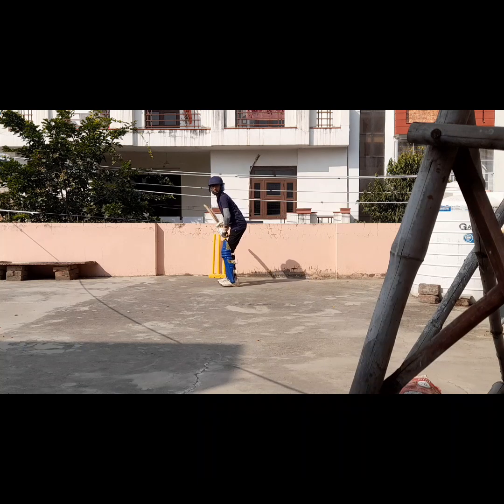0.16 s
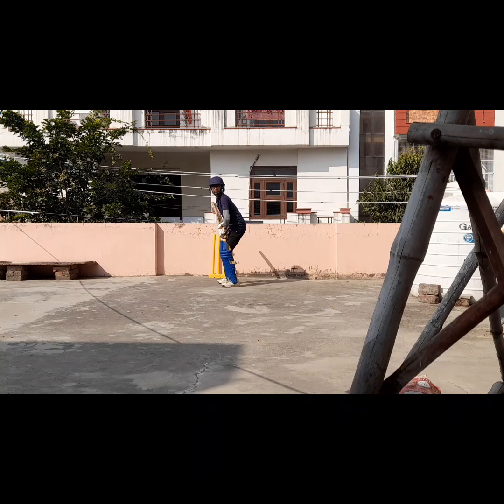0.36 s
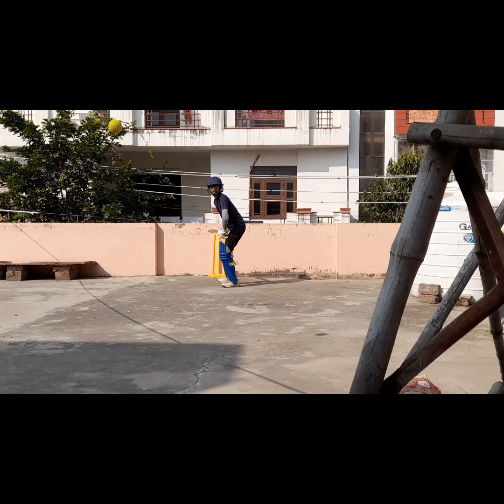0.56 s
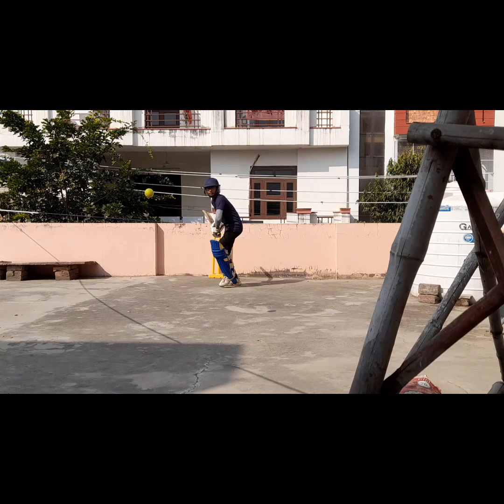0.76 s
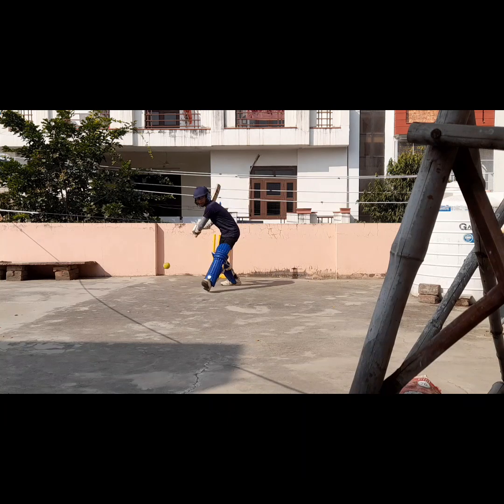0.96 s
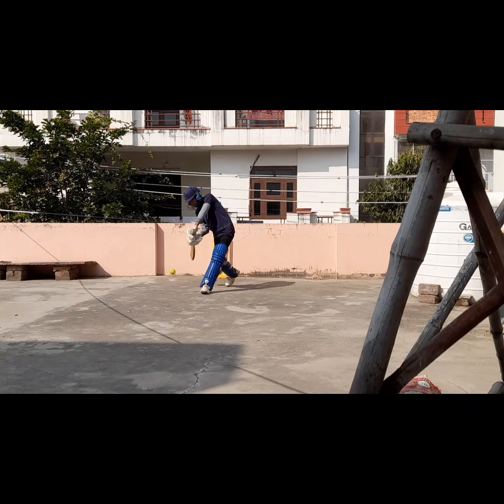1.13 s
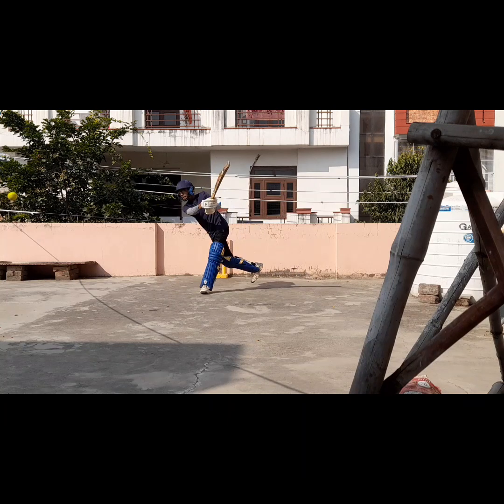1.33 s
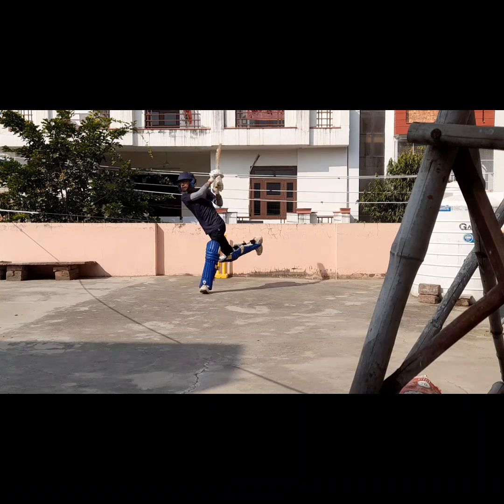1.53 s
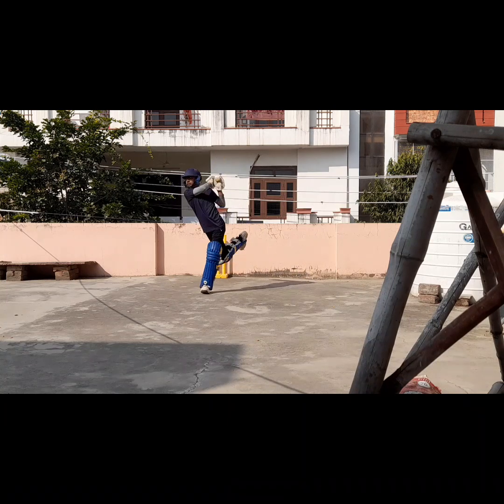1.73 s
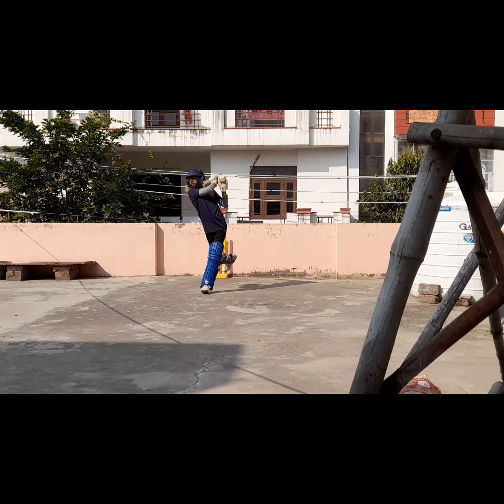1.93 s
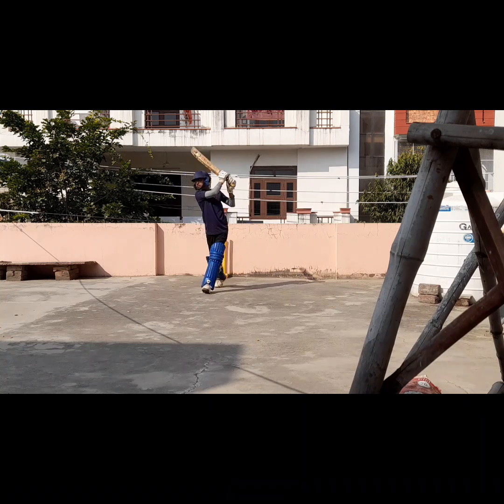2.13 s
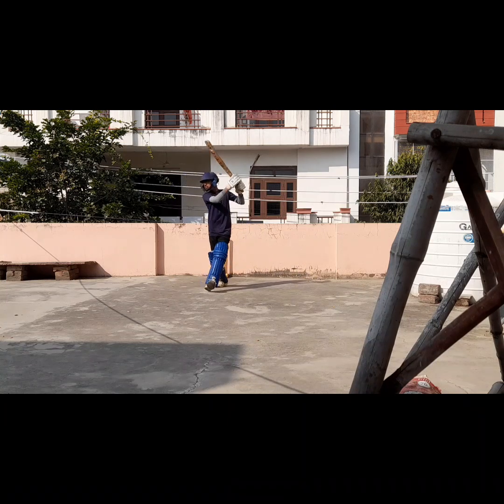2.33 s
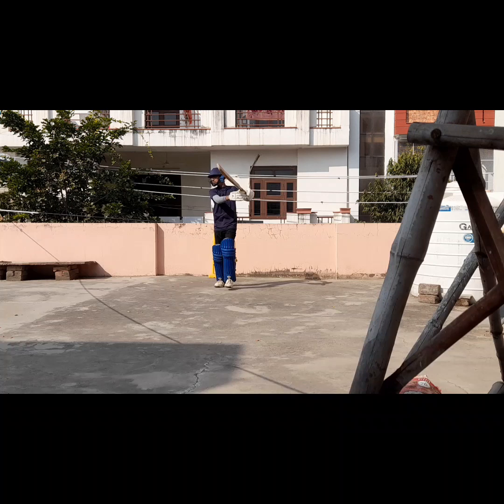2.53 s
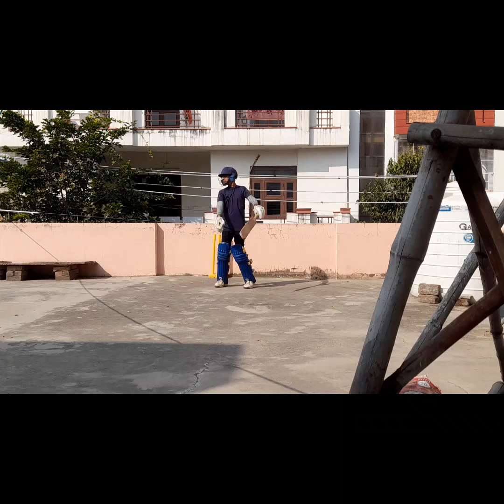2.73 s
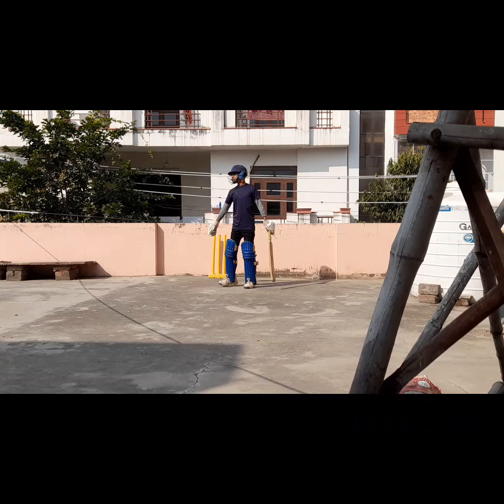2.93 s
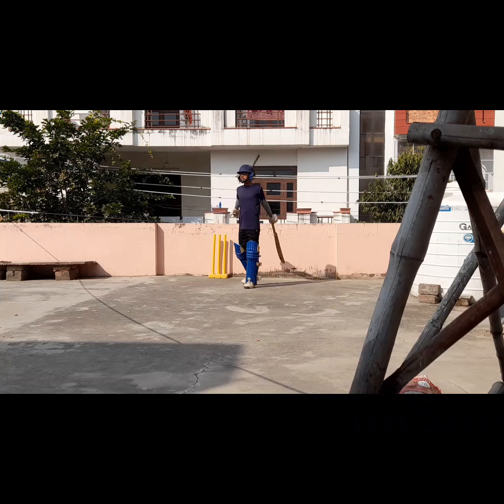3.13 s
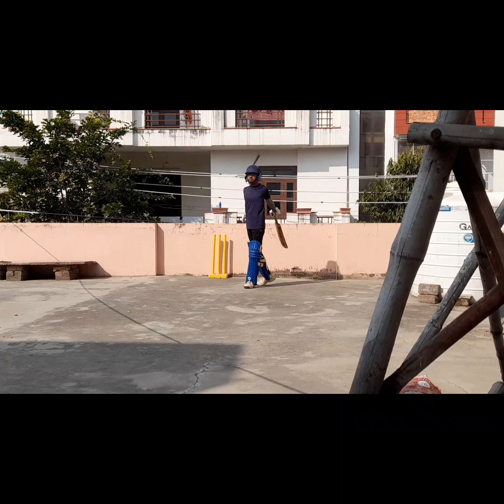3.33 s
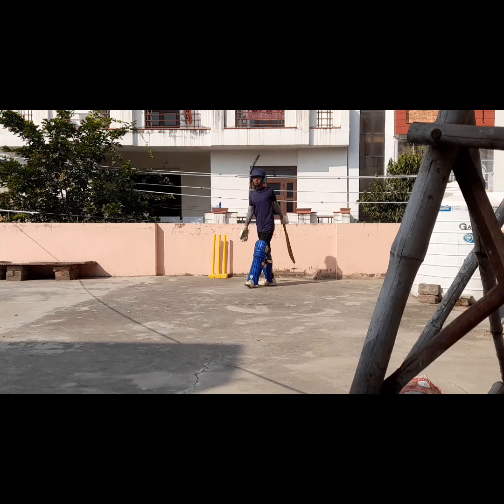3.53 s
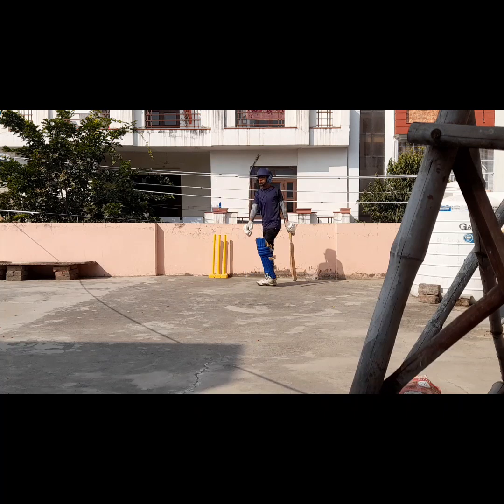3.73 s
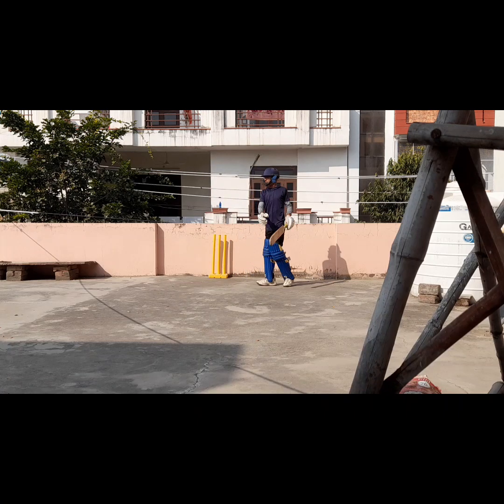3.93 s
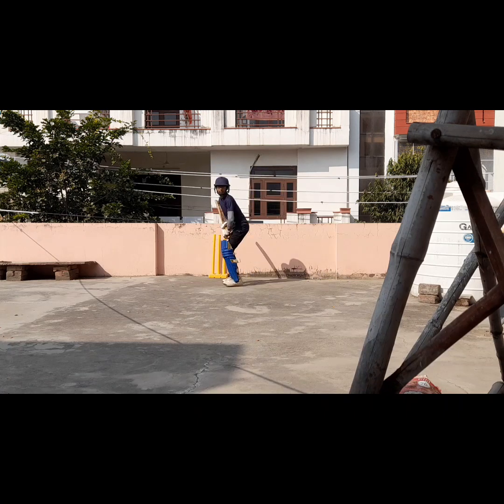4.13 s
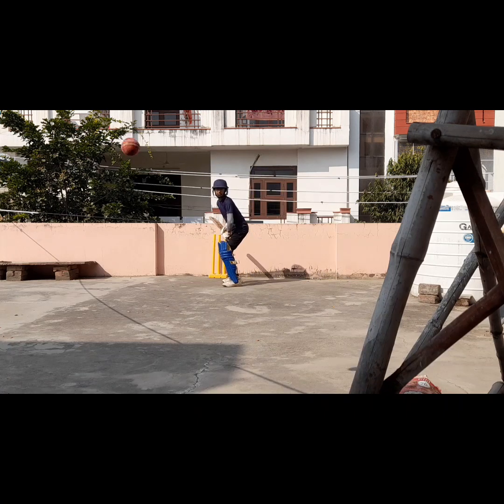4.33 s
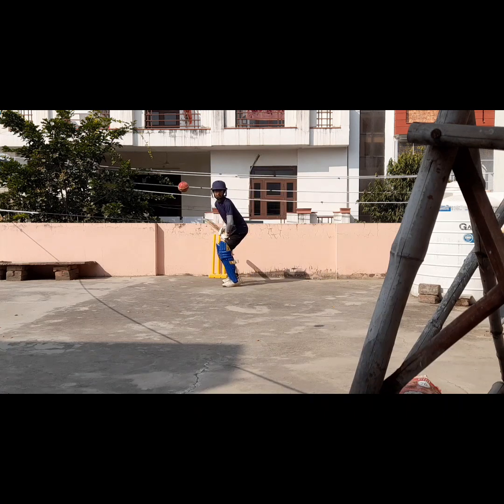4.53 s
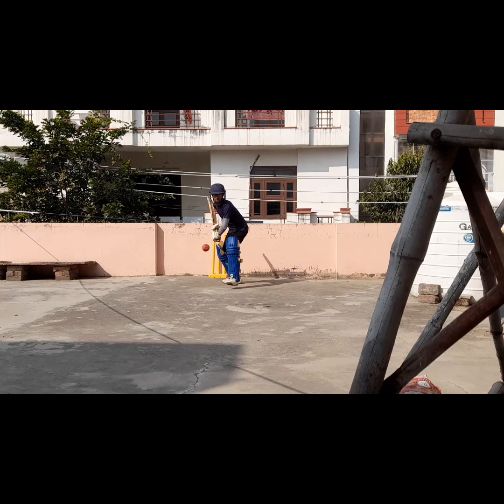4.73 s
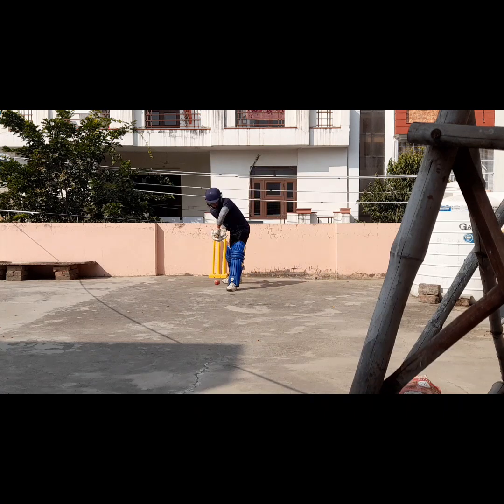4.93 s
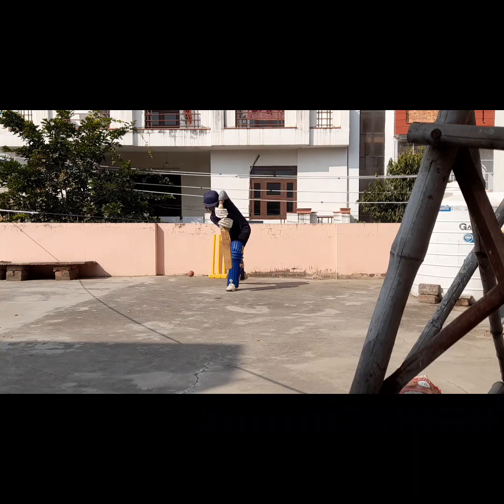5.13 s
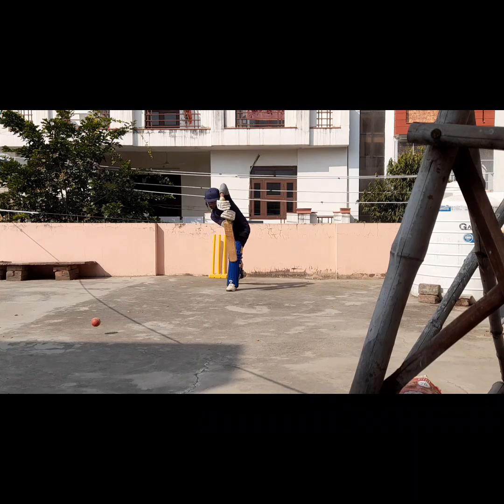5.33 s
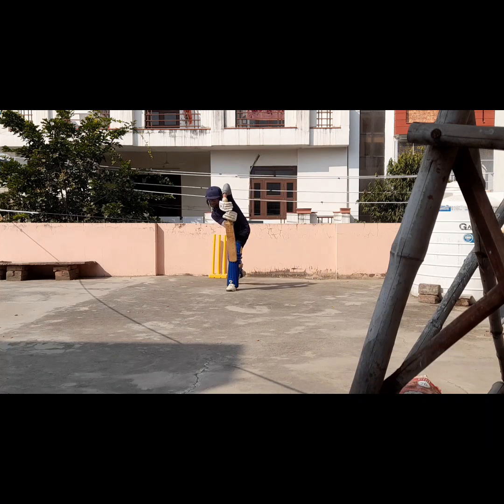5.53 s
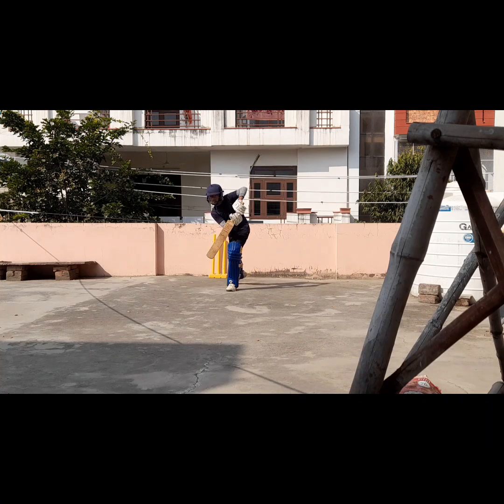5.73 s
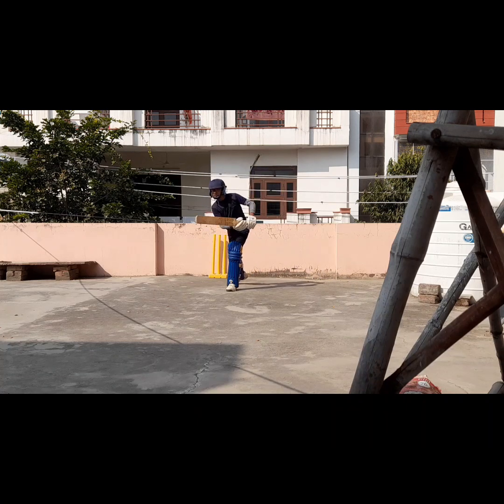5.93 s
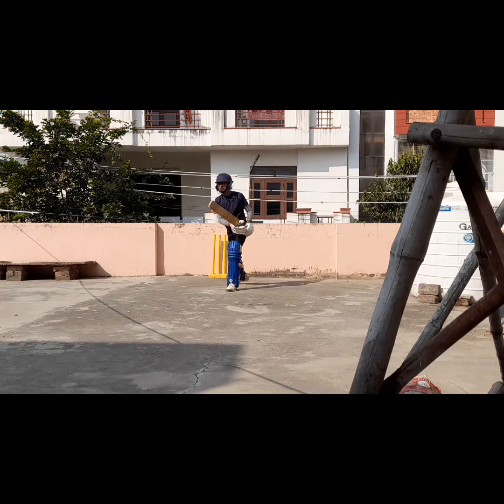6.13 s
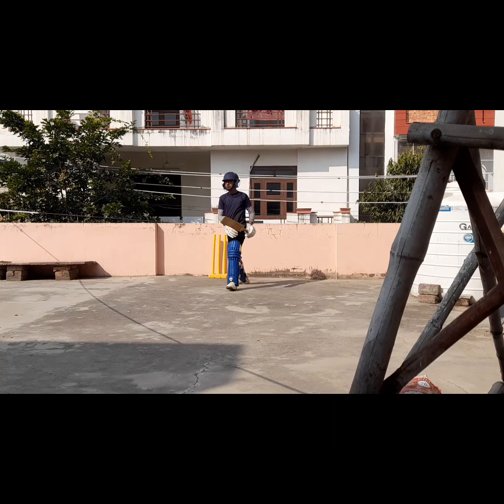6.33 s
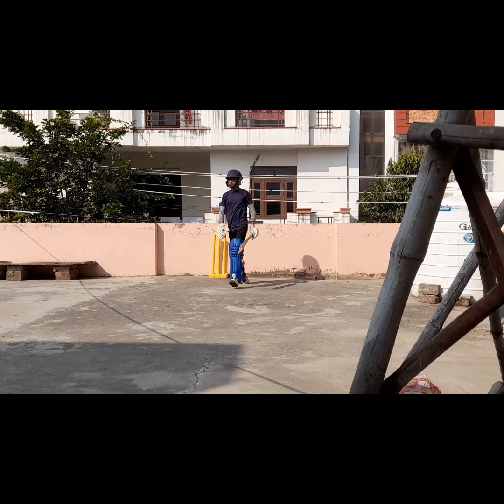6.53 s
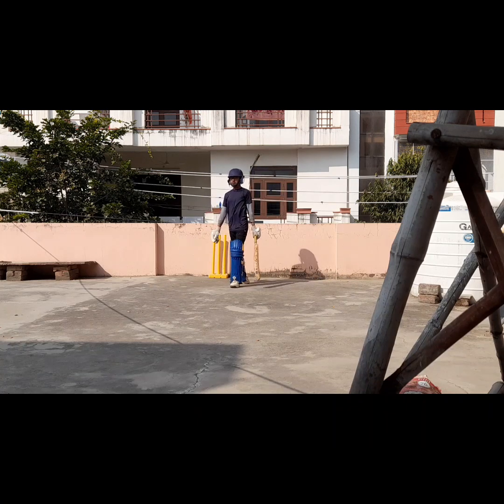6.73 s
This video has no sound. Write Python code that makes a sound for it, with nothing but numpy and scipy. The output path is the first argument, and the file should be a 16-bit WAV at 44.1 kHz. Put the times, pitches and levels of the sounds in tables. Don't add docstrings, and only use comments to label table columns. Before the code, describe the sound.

Phone pickup on an open concrete rooftop among houses, the batter slightly left. Over heavy engine throb come a faint coo, a ball bounce, a hard bat crack with wall echoes and a boomy door thump. A brief cut leads to softer traffic rumble, a leather bounce, a woody bat blow, low thuds and a short hollow rattle, with thin metallic jingles throughout and a distant horn last.

```python
import sys
import numpy as np
from scipy import signal
from scipy.fft import rfft, irfft, next_fast_len
from scipy.io import wavfile
from scipy.ndimage import uniform_filter1d, map_coordinates

SR = 44100
rng = np.random.default_rng(int(sys.argv[2]) if len(sys.argv) > 2 else 0)


def unload_audio(sound):
    columns = np.transpose(np.atleast_2d(sound))
    steps = np.round(np.clip(columns, -1, 1) * 32767)
    wavfile.write(sys.argv[1], SR, steps.astype(np.int16))


def how_loud(loudness_db):
    steps = np.asarray(loudness_db, float) / 20
    return 10 ** steps


N = 298998


def unit(x):
    return x / np.sqrt(np.mean(x ** 2) + 1e-20)


def along(points, hz):
    f, v = np.transpose(points)
    return np.interp(np.log(hz + 1), np.log(f + 1), v)


def curves(rows):
    s, *cols = np.transpose(rows)
    return [np.interp(np.arange(N) / SR, s, c) for c in cols]


def wobble(rate_hz, size=N):
    coarse = np.arange(0, size + 32, 32)
    knots = rng.standard_normal(int(size * rate_hz / SR) + 4)
    return np.interp(np.arange(size), coarse, map_coordinates(knots, [coarse * rate_hz / SR]))


def filtered(x, response):
    m = next_fast_len(x.shape[-1] + 4096)
    return irfft(rfft(x, m) * response(np.fft.rfftfreq(m, 1 / SR)), m)[..., :x.shape[-1]]


def add(track, s, sound):
    part = track[:, round(s * SR):][:, :sound.shape[1]]
    part += sound[:, :part.shape[1]]


def train(s, gain):
    return np.bincount(np.round(np.ravel(s) * SR).astype(int), np.ravel(gain), N)


# f/Hz, correlation [0-1]
LIKENESS = [(60, .98), (180, .96), (400, .78), (800, .32), (1650, .1), (15000, .01)]


def paired(x, gain):
    turn = lambda hz: np.arccos(np.clip(along(LIKENESS, hz), -1, 1)) / 2
    mid, side = filtered(x, lambda hz: gain(hz) * [np.cos(turn(hz)), np.sin(turn(hz))])
    return np.array([mid + side, mid - side])


def rush(gain, patchy_db):
    z = signal.stft(rng.standard_normal((2, N)), nperseg=512)[2]
    field = uniform_filter1d(rng.standard_normal(z.shape[1:]), size=5, axis=0)
    field = unit(uniform_filter1d(field, size=12, axis=1))
    noise = signal.istft(z * how_loud(patchy_db * field), nperseg=512)[1][:, :N]
    return unit(paired(noise, gain))


def town(rumble_db, street_db, air_db, colour):
    low = lambda hz, edge_hz: 1 / (1 + (hz / edge_hz) ** 6)
    tint = lambda hz: how_loud(along(colour, hz))
    rumble = rush(lambda hz: tint(hz) * low(hz, 440), patchy_db=2.5) * how_loud([[-.6], [.6]])
    street = rush(lambda hz: tint(hz) * (low(hz, 4480) - low(hz, 320.5)), patchy_db=1.5) * how_loud([[-.9], [.9]])
    air = rush(lambda hz: tint(hz) * (1 - low(hz, 5200)), patchy_db=.4)
    rumble_gain = how_loud(rumble_db + 2.6 * wobble(10))
    street_gain = how_loud(street_db + 0.18 * wobble(8))
    return rumble_gain * rumble + street_gain * street + how_loud(air_db) * air


# f/Hz, level/dB per Hz
CALM_COLOUR = [(15, -70), (25, 3.5), (70, -12.5), (92, 0.5), (134, -16.5), (200, -6.5), (270, -15),
               (439, -20), (560, -24.5), (659, -21.5), (1400, -31.5), (2000, -36.5), (2160, -38),
               (6560, -40.5), (16000, -48.5)]
# t/s, level/dB
FAR_TRAFFIC = [
    (4.1, 5.5),
    (4.4, -3),
    (4.7, 4.5),
    (5.4, 7),
    (6.4, 3),
    (6.78, 3),
]
# full from t/s, to t/s, ramp before and after/s, street level/dB, air
# level/dB
GAIN_DUCK = (5.5, 6, 0.95, -9, -16)
CALM_RUMBLE_DB, CALM_STREET_DB, CALM_AIR_DB = -54.5, -63, -73.5
RUMBLE_DUCK_DB = -4
CALM_FOLLOWS = 0.63


def calm_town():
    t = np.arange(N) / SR
    traffic_db, = curves(FAR_TRAFFIC)
    begin, end, ramp, street_db, air_db = GAIN_DUCK
    duck = np.clip(np.minimum(t - begin, end - t) / ramp + 1, 0, 1)
    far_db = CALM_FOLLOWS * traffic_db
    return town(CALM_RUMBLE_DB + traffic_db + RUMBLE_DUCK_DB * duck,
                CALM_STREET_DB + far_db + street_db * duck,
                CALM_AIR_DB + far_db + air_db * duck, CALM_COLOUR)


# f/Hz, level/dB per Hz
BUSY_COLOUR = [(15, -49), (25, -4.5), (74, -10), (97, -4.5), (195, 4.5), (384, -24.5), (476, -18),
               (560, -25.5), (1130, -33), (1520, -32), (3520, -37.5), (4250, -29.5), (8140, -39),
               (12500, -41), (16000, -62.5)]
BUSY_STREET_DB, BUSY_AIR_DB = -48, -63.5
STREET_FOLLOWS, AIR_FOLLOWS = 0.19, 0.1


def busy_town():
    level_db = curves(ENGINE_RUN)[1]
    rumble_db = uniform_filter1d(level_db, size=SR // 2) - 9.5
    load_db = uniform_filter1d(level_db, size=SR // 4) + 35
    return town(rumble_db, BUSY_STREET_DB + STREET_FOLLOWS * load_db,
                BUSY_AIR_DB + AIR_FOLLOWS * load_db, BUSY_COLOUR)


# f/Hz, width/Hz, level/dB, faded out at t/s
FAN_LINE = (2004, 39.5, -77.5, 6)


def fan():
    hz, width, db, end = FAN_LINE
    line = filtered(rng.standard_normal((2, N)), lambda f: 1 / (1 + ((f - hz) / width * 2) ** 4))
    return how_loud(db) * unit(line) * np.clip((end - np.arange(N) / SR) / 0.29, 0, 1)


# middle t/s, half length/s, f/Hz, level/dB
COO = (.365, .035, 478, -42)


def dove():
    s, half, hz, db = COO
    t = np.arange(N) / SR - s
    return how_loud(db) * np.exp(-.5 * (t / half) ** 2) * np.sin(2 * np.pi * hz * (t - 0.066 * t * t))


# t/s, firing f/Hz, level/dB, labour (lift of 5th order)/dB
ENGINE_RUN = [(0.0, 24.14, -39.5, 6.5), (0.13, 26.58, -31.5, 1), (0.36, 27.86, -29, -3),
              (0.61, 27.37, -28.5, -10), (0.88, 26.67, -35.5, 1.5), (1.06, 25.68, -31, 2.5),
              (1.2, 22.76, -32, 0.5), (1.4, 21.2, -35.5, 13.5), (1.74, 21.77, -35.5, -7.5),
              (2.18, 24.08, -34, 8.5), (2.4, 24.77, -31.5, -3.5), (2.64, 22.12, -47, 15),
              (2.79, 23.6, -40.5, 16), (2.93, 22.8, -33.5, 5), (3.08, 21.37, -37.5, 14),
              (3.22, 20.77, -34, 15), (3.8, 22.64, -37.5, 7), (4.06, 23.78, -38.5, 14)]
# f/Hz, level/dB
EXHAUST = [(30, -22), (42, -7), (56, -6), (66, -15), (82, -13), (110, -6), (140, -6), (170, -1), (200, 0),
           (228, -3), (250, -15), (280, -22), (340, -29), (600, -36)]
# multiple of firing rate, level/dB
GEAR_LINES = [
    (36, -8),
    (73, .1),
    (108, -10),
    (139, -12),
    (146, -10.5),
]
STEADY_HZ, SHAKY_HZ = 27.5, 23.5
WHINE_DB, WHINE_DB_PER_HZ = -24, .65


def engine():
    firing_hz, engine_db, labour_db = curves(ENGINE_RUN)
    turns = 2 * np.pi * np.cumsum(firing_hz) / SR
    shaky = np.clip((STEADY_HZ - firing_hz) / (STEADY_HZ - SHAKY_HZ), .15, 1)
    orders = 0
    for k in range(2, 20):
        fading_db = shaky * (3.5 * wobble(3.5) + 3.5 * wobble(10))
        order_db = along(EXHAUST, k * firing_hz) + fading_db * (.7 if k == 5 else 1) + labour_db * (k == 5)
        phase = rng.uniform(0, 2 * np.pi) + 1.1 * shaky * wobble(8)
        orders = orders + how_loud(order_db) * np.sin(k * turns + phase)

    fuzz = lambda: .3 + wobble(220)
    whine = np.zeros((2, N))
    for ear in range(2):
        for k, db in GEAR_LINES:
            whine[ear] += how_loud(db) * (fuzz() * np.sin(k * turns) + fuzz() * np.cos(k * turns))
    whine_db = np.roll(uniform_filter1d(engine_db, size=SR // 2), SR // 7) + 2.2 * wobble(12)
    whine_db = whine_db + WHINE_DB + WHINE_DB_PER_HZ * (firing_hz - firing_hz.mean())
    return how_loud(engine_db) * unit(orders) * how_loud([[-.9], [.9]]) + how_loud(whine_db) * unit(whine)


# t/s, roar level/dB
PULL = [
    (2.6, -78),
    (2.95, -51),
    (3.6, -54),
    (4.06, -59.5),
]
# f/Hz, width/Hz, level/dB
ROAR_BANDS = [
    (1480, 450, -2),
    (2390, 390, -4),
]


def roar():
    bands = lambda hz: sum(how_loud(db) * np.exp(-.5 * ((hz - centre) / width) ** 2 * 4)
                           for centre, width, db in ROAR_BANDS)
    return how_loud(curves(PULL)[0]) * rush(bands, patchy_db=-0.5)


# f/Hz, level/dB
HORN_PARTIALS = [(2455, -85), (2891, -74), (3240, -63.5), (3295, -64.5), (3332, -69), (3440, -78),
                 (3688, -72), (4086, -90), (4463, -102), (4942, -91), (5766, -99), (6099, -99.5),
                 (6492, -99), (6869, -90), (6966, -92.5), (7246, -100)]
# f/Hz, level/dB
STREET_BLUR = [(1800, -60), (2500, -14), (3300, 2), (4000, -13), (5000, -26), (7000, -17), (8000, -63)]
HORN_S, HORN_SWELL_S = 6.355, .11
HORN_DB, HORN_THROB_DB, BLUR_DB = -52, .8, -12


def horn():
    swell = np.clip((np.arange(N) / SR - HORN_S) / HORN_SWELL_S, 0, 1) ** 1.9
    t = np.arange(SR // 2) / SR
    flutter = lambda: wobble(80, size=len(t))
    tones = np.zeros((2, len(t)))
    for ear in range(2):
        for hz, db in HORN_PARTIALS:
            tones[ear] += how_loud(db + 3.5 * flutter()) * np.sin(2 * np.pi * hz * t + 1.2 * flutter())
    blur = filtered(rng.standard_normal((2, len(t))), lambda f: how_loud(along(STREET_BLUR, f)))
    call = unit(unit(tones) + how_loud(BLUR_DB) * unit(blur))
    call = np.pad(call, ((0, 0), (N - len(t), 0)))
    return swell * how_loud(HORN_DB + HORN_THROB_DB * wobble(14)) * call * how_loud([[-1.5], [1.5]])


def clicks(impulses, low_db):
    t = np.arange(SR // 8) / SR
    decay = how_loud(-60 * t / .0045) + how_loud(-29 - 60 * t / 0.08)
    shape = signal.fftconvolve(impulses, decay)[:N]
    colour = [(1200, low_db - 44), (4500, low_db + 11.0), (7500, low_db + 11.5), (10000, -1.0),
              (13000, 0.5), (15000, -8), (16500, -19.5)]
    return filtered(shape * rng.standard_normal((2, N)), lambda f: how_loud(along(colour, f)))


# t/s, first click level/dB, rattle length/s, 1st and 2nd long mode level/dB
STEEL_SHAKES = [(0.649, -30.5, .032, -18.5, -19), (1.207, -31.5, .001, -19, -32),
                (1.77, -38, .012, -15, -23), (1.796, -37, .008, -27, -35), (1.807, -30.5, .006, -32, -25),
                (2.1302, -28, .007, -18, -13), (2.208, -39.5, .001, -24, -18), (2.219, -37, .001, -12, -5),
                (2.334, -42.5, .001, -5, -32), (2.364, -45, .012, -6, -27), (3.221, -41, .016, -15, -33.5),
                (1.495, -69, .001, 2, -20), (4.34, -51, .01, -20, -20), (4.6143, -34.5, .001, -28.5, -15.5),
                (4.62, -38.5, .012, -21, -27.5), (4.631, -35.5, .006, -36, -36),
                (5.193, -33, .001, -14, -19.5), (5.221, -23, .001, -47, -14.5),
                (5.247, -32.5, .001, -16, -9), (5.87, -39.5, .013, -21, -30.5),
                (5.901, -38.5, .031, -29, -26), (5.9074, -41, .001, -28, -27), (5.922, -45, .006, -32, -23),
                (5.948, -44, .006, -20, -28), (6.3058, -59, .001, -20.5, -42),
                (6.399, -26.5, .001, -19, -15.5), (6.427, -43, .005, -35, -35),
                (6.494, -60, .001, -11, -30)]
# t/s, level/dB
DULL_TICKS = [(1.5998, -51), (1.6755, -48), (1.8161, -37), (3.8969, -37), (4.131, -55), (4.1515, -56),
              (4.3369, -45.5), (4.6302, -42.5), (4.6347, -37), (0.6541, -34.5), (4.785, -56), (5.208, -39),
              (6.399, -65), (6.4035, -57), (5.3934, -38), (5.4037, -39), (5.922, -52), (5.934, -53),
              (5.949, -59)]
# f/Hz, t60/s
LONG_MODES = [
    (12390, 0.2),
    (14760, 0.075),
]
# f/Hz, level/dB, t60/s
SHORT_MODES = [
    (11050, 6, 0.02),
    (12800, -9, .02),
    (10410, -15, 0.048),
    (15350, -38.5, 0.012),
]
# t/s, level/dB
STILLED = [
    (6.42, 0),
    (6.426, -15),
    (6.485, -15),
    (6.49, 0),
]
TOUCH_GAP_S, GAP_SCATTER = 0.0054, 0.13
RATTLE_DB, RATTLE_SCATTER_DB, RATTLE_RING_DB = -7, -3.5, -25
STEEL_PAN_DB, STEEL_LOW_DB, TICK_LOW_DB = 11, -37, -15.5


def jingle():
    t = np.arange(SR // 4) / SR
    start, db, length, *ring_db = np.transpose(STEEL_SHAKES)[..., None]
    gap, size, *luck = rng.standard_normal((8, len(STEEL_SHAKES), 7))
    later = np.arange(7) > 0
    after = np.cumsum(later * TOUCH_GAP_S * np.exp(GAP_SCATTER * gap), axis=1)
    s = start + after
    gain = how_loud(db + later * (RATTLE_DB + RATTLE_SCATTER_DB * size)) * (after <= length)

    def mode(hz, t60, strength):
        ring = how_loud(-60 * t / t60) * np.sin(2 * np.pi * hz * t) * (1 - np.exp(-t / 0.0011))
        return signal.fftconvolve(train(s, strength), ring)[:N]

    chips = sum(mode(hz, t60, gain * how_loud(level + 4.9 * k))
                for (hz, level, t60), k in zip(SHORT_MODES, luck))
    rings = sum(mode(hz, t60, gain * how_loud(level + later * (RATTLE_RING_DB + 2 * k)))
                for (hz, t60), level, k in zip(LONG_MODES, ring_db, luck[4:]))
    rings *= how_loud(curves(STILLED)[0])
    tick_s, tick_db = np.transpose(DULL_TICKS)
    noise = clicks(train(s, gain), STEEL_LOW_DB) + clicks(train(tick_s, how_loud(tick_db)), TICK_LOW_DB)
    return how_loud(STEEL_PAN_DB * np.array([[.5], [-.5]])) * (how_loud(-16.5) * chips + rings + how_loud(5.5) * noise)


# t/s, level/dB
SLAB_THUDS = [
    (5.002, -29.5),
    (5.0145, -31),
    (5.1461, -14),
    (5.394, -27),
    (5.7468, -26.5),
]
# f/Hz, level/dB, t60/s
SLAB_MODES = [
    (229.3, -4, 0.1),
    (306.8, 0.5, 0.087),
]
# t/s, level/dB
KERB_RINGS = [
    (6.0525, -19.5),
    (6.0612, -23),
    (6.082, -28),
    (6.099, -26),
    (6.126, -35),
]
# f/Hz, level/dB, t60/s
KERB_MODES = [
    (470, -2.5, .05),
    (581, -4, .07),
    (840, -11, .07),
]
# t/s, level/dB
DOOR_BOOMS = [
    (1.8855, -16),
    (1.9065, -22.5),
    (1.9255, -24),
    (1.935, -25),
]
# f/Hz, level/dB, t60/s
DOOR_MODES = [
    (185.6, 0, 0.1),
    (330, -9, 0.042),
]


def ringing(blows, modes):
    t = np.arange(SR // 4) / SR
    ring = sum(how_loud(db - 60 * t / t60) * np.sin(2 * np.pi * hz * t) for hz, db, t60 in modes)
    ring = ring * (1 - np.exp(-t / 0.0031))
    s, db = np.transpose(blows)
    return signal.fftconvolve(train(s, how_loud(db)), ring)[:N]


def thuds():
    return ringing(SLAB_THUDS, SLAB_MODES) + ringing(KERB_RINGS, KERB_MODES) + ringing(DOOR_BOOMS, DOOR_MODES)


# f/Hz, t60/s
YARD_DECAY = [(100, 1), (300, 0.49), (1000, 0.7), (3000, 0.75), (8000, 0.49), (15000, 0.5)]
FAR_RISE_S, FAR_T60_S, FAR_LOW_HZ, FAR_HIGH_HZ = 0.16, 0.85, 350, 1510


def yard(walls, direct, fronts_s, far_db, echo_db, tail_db):
    hz, t, z = signal.stft(rng.standard_normal((2, SR)), SR, nperseg=256)
    houses = 1 + 0.88 / (1 + (t / fronts_s) ** 16)
    shape = (1 - np.exp(-(t / 0.00057) ** 2)) * houses * how_loud(-60 * t / along(YARD_DECAY, hz)[:, None])
    far = how_loud(far_db - 60 * t / FAR_T60_S) * np.exp(-(FAR_RISE_S / (t + .001)) ** 2)
    far_band = 1 / (1 + (hz / FAR_HIGH_HZ) ** 12) / (1 + (FAR_LOW_HZ / (hz + 1)) ** 4)
    shape = shape + far * far_band[:, None]
    answer = paired(signal.istft(z * shape, SR, nperseg=256)[1], np.ones_like)
    answer = how_loud(tail_db - 3.0) * answer / np.linalg.norm(answer[0])
    answer[[0, 1], [0, 3]] += direct

    t = np.arange(SR // 40) / SR
    for delay, db, lag, pan_db in walls:
        for ear, side in enumerate((.5, -.5)):
            decay = how_loud(-60 * t / (.004 + .12 * delay))
            rough = (.12 + 12 * delay ** 2) * decay * rng.standard_normal(len(t))
            rough[0] = 1
            rough /= np.linalg.norm(rough)
            loss = min(11 * delay, .8)
            dull = signal.lfilter([1, 0], [1, -loss], rough) * (1 - loss)
            at = round((delay + side * lag) * SR)
            answer[ear, at:][:len(t)] += how_loud(db + echo_db + side * pan_db) * dull
    return answer


LEAD = 60


def pulse(gain, soft):
    cepstrum = irfft(np.log(gain(np.fft.rfftfreq(4096, 1 / SR)) + 1e-6))
    cepstrum[1:2048] *= 2 - soft
    cepstrum[2049:] *= soft
    shape = np.roll(irfft(np.exp(rfft(cepstrum))), LEAD)
    shape[:LEAD] *= np.linspace(0, 1, LEAD) ** .7
    shape = shape[:2048] * np.hanning(4096)[2048:]
    return shape / np.abs(shape).max()


# delay/s, level/dB, left lag/s, left-right/dB
CREASE_WALLS = [(.005, -12, -.0002, 5), (.0093, -5.5, .0001, 0), (.0106, -2, .0002, -3),
                (.0127, -11, -.0003, 4), (.021, -11, .0004, 0), (.054, -14, .0002, 0),
                (.0617, -9, -.0001, 0), (.072, -12, .0002, 0), (.086, -15, -.0002, 0),
                (.125, -17, .0002, 0), (.16, -17, -.0003, 0)]
CORNER_WALLS = [(.0043, -2, .0002, -3), (.011, -10, -.0002, 0), (.031, -12, .0003, 0),
                (.0458, -6, -.0002, 0), (.051, -11, .0001, 0), (.058, -14, .0002, 0),
                (.074, -14, -.0002, 0), (.099, -16, .0002, 0), (.155, -21, .0002, 0)]
# f/Hz, level/dB per Hz
LIGHT_COLOUR = [(80, -24.5), (300, 12), (600, 0.5), (1200, 3.5), (2500, -0.5), (4500, -2), (6500, -4.5),
                (10000, -3.5), (14000, -12), (16500, -40)]
PITCH_COLOUR = [(71, -45), (120, -8), (314, -5), (698, -8.5), (930, -6), (1400, -7.5), (1860, -22),
                (2480, -15), (3380, -22), (10200, -33.5), (16000, -50.5)]
WILLOW_COLOUR = [(70, -45.5), (150, -17), (400, -6.5), (600, 4), (700, -2), (860, 2), (1050, -8.5),
                 (1300, -0.5), (1480, -13), (1850, -25), (3050, -25), (4060, -21.5), (5200, -29.5),
                 (10000, -32.5), (16000, -44.5)]
THUMP_COLOUR = [(60, -15), (120, -9.5), (190, 4), (250, -6.5), (330, -16.5), (500, -20), (660, -28.5),
                (1900, -29.5), (7000, -38.5), (16000, -51.5)]
ROLL_COLOUR = [(59, -68), (100, -3), (300, 2), (415, -5.5), (950, -11), (1910, -33.5), (4670, -34.5),
               (14100, -51), (16000, -72)]
KERB_COLOUR = [(60, -18), (120, 3), (300, 9), (420, 3), (540, 7), (700, 4.5), (840, 9), (960, -23),
               (1050, -10), (1400, -10), (2200, -21), (3320, -32), (4290, -27.5), (6020, -31.5),
               (16000, -48)]
# t/s, peak level/dB, brightness/dB per octave, wall echoes/dB, tail/dB
LIGHT_BLOWS = [
    (1.1612, -20, -1.5, 0.5, 4),
    (1.2831, -0.5, 1, 0, 0.5),
    (2.792, -40, -3, -10, 14.5),
]
PITCH_BLOWS = [
    (4.9993, -14.5, 0.67, -3, 0.43),
    (5.3945, -23.5, -1.3, 0, 2.9),
]
WILLOW_BLOWS = [
    (5.1458, -2, 0.51, 0.87, 1.6),
]
THUMP_BLOWS = [
    (1.8845, -11.5, 1, 0.52, 6),
    (1.978, -37, -1.73, -1.24, -4),
    (4.276, -45, -1.2, -1.4, 8),
]
ROLL_BLOWS = [
    (5.7455, -22.5, 0.27, -4.5, -2.3),
]
KERB_BLOWS = [
    (6.0543, -17.5, 2.6, -2, 6),
]
SOFT_BLOWS = [
    (1.9298, -19, -.5, -12, -9),
    (5.786, -41, -2, -6, -3),
    (2.4346, -22, -1.5, -2, 2),
    (3.8963, -28, .8, -5, -5),
    (4.9281, -41.5, -1.2, -2, 6),
]
# softness [0-1], push or pull [+1/-1], left lag/samples, crunch level/dB
CONTACT_KINDS = [
    (.55, -1, 0, 0),
    (.95, -1, 0, 0),
    (.95, 1, 0, 8),
    (.9, -1, 0, -6),
    (.55, -1, 20, 0),
    (.9, 1, -20, 5),
    (.55, -1, 0, 0),
]
CRUNCH, CRUNCH_T60_S, CRUNCH_HZ = .13, .012, 2920


def knocks():
    track, t = np.zeros((2, N)), np.arange(SR // 50) / SR
    # walls, direct share, house fronts answer until/s, far houses/dB
    crease = (CREASE_WALLS, 1.07, 0.23, -2)
    corner = (CORNER_WALLS, 0.85, 0.018, 1.9)
    behind_parapet = (CREASE_WALLS, .35, .05, -8)
    kinds = [(LIGHT_BLOWS, LIGHT_COLOUR, crease),
             (PITCH_BLOWS, PITCH_COLOUR, crease),
             (WILLOW_BLOWS, WILLOW_COLOUR, crease),
             (THUMP_BLOWS, THUMP_COLOUR, corner),
             (ROLL_BLOWS, ROLL_COLOUR, corner),
             (KERB_BLOWS, KERB_COLOUR, corner),
             (SOFT_BLOWS, LIGHT_COLOUR, behind_parapet)]
    for (blows, colour, place), (soft, sign, lag, crunch_db) in zip(kinds, CONTACT_KINDS):
        late, early = max(lag, 0), max(-lag, 0)
        for s, db, bright_db, echo_db, tail_db in blows:
            tint = lambda hz: how_loud(along(colour, hz) + bright_db * np.log2((hz + 100) / 800))
            body = pulse(tint, soft=soft)
            answer = sign * yard(*place, echo_db, tail_db)
            grit = paired(rng.standard_normal((2, len(t))), lambda hz: hz / (hz + CRUNCH_HZ))
            answer[:, :len(t)] += CRUNCH * how_loud(crunch_db - 60 * t / CRUNCH_T60_S) * grit
            answer = np.array([np.pad(answer[0], (late, early)), np.pad(answer[1], (early, late))])
            blow = signal.fftconvolve(how_loud(db + 4.5) * body[None], answer, axes=1)
            add(track, s - .7 * LEAD / SR, blow)
    return track


# from t/s, to t/s
SILENCE = (4.058, 4.098)


def scene():
    t = np.arange(N) / SR
    first = np.clip((SILENCE[0] - t) / 0.0012, 0, 1)
    second = np.clip((t - SILENCE[1]) / 0.00095, 0, 1)
    busy = busy_town() + engine() + roar() + dove()
    calm = calm_town() + horn() + fan()
    near = jingle() + thuds() + knocks()
    leak = how_loud(-46.0) * (1 - first) * calm
    return first * (busy + near) + second * (calm + near) + leak


def roll_off(x):
    return signal.sosfilt(signal.butter(12, 16540, fs=SR, output="sos"), x)


def record(dry):
    band = lambda hz: (hz / 40) ** 8 / (1 + (hz / 40) ** 8) / (1 + (hz / 16200) ** 80)
    port = lambda hz: how_loud(-6 * np.exp(-((hz - 8450) / 500) ** 2))
    x = 1.05 * filtered(dry, lambda hz: band(hz) * port(hz))
    limited = x / (1 + np.abs(x / 0.59) ** 8) ** (1 / 8)
    return roll_off(limited)


dry = scene()
out = record(dry)
unload_audio(out)
```